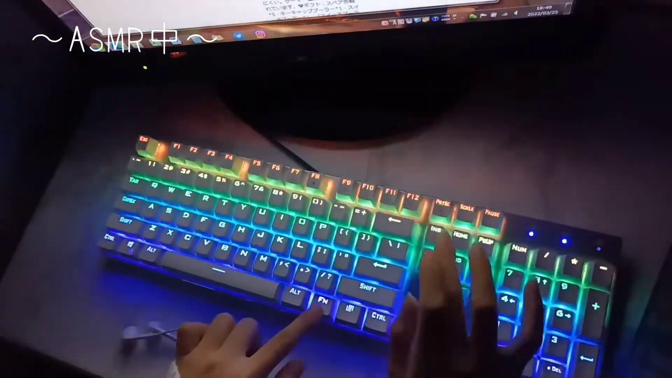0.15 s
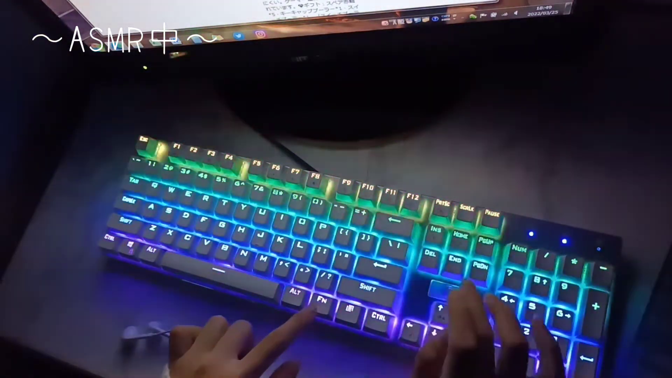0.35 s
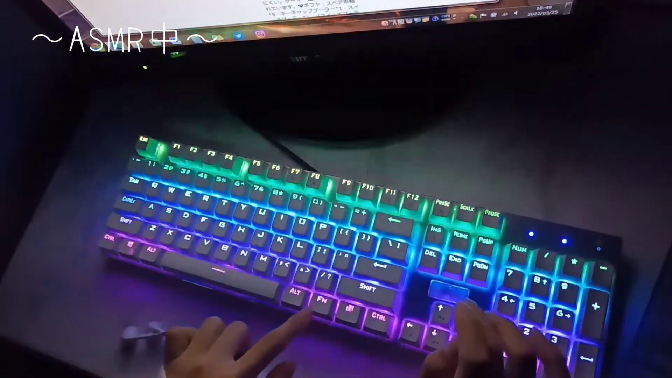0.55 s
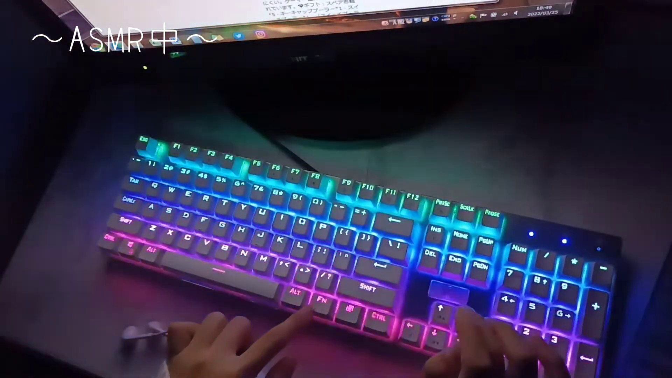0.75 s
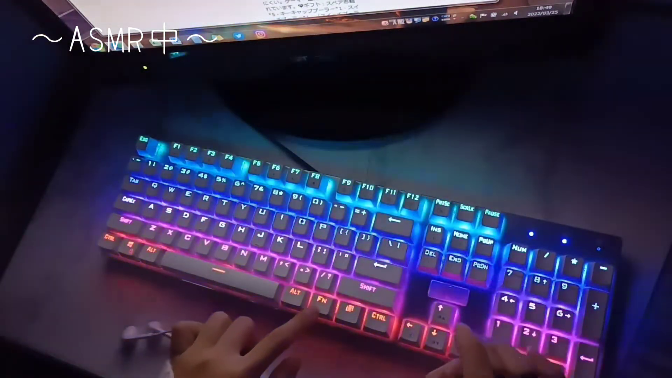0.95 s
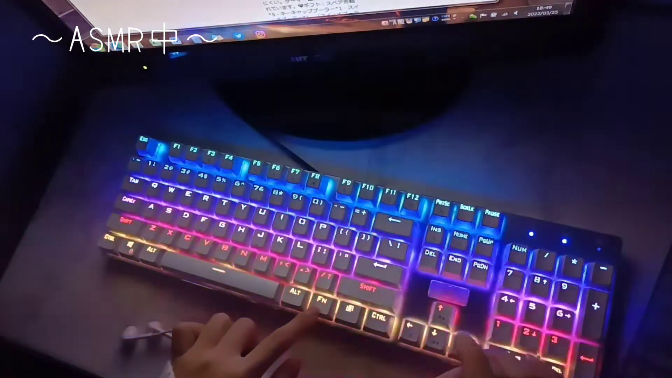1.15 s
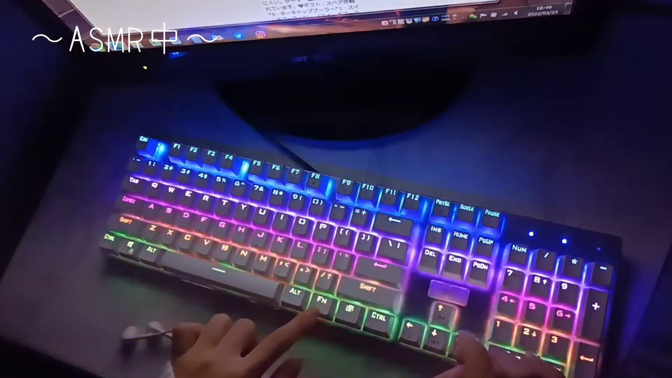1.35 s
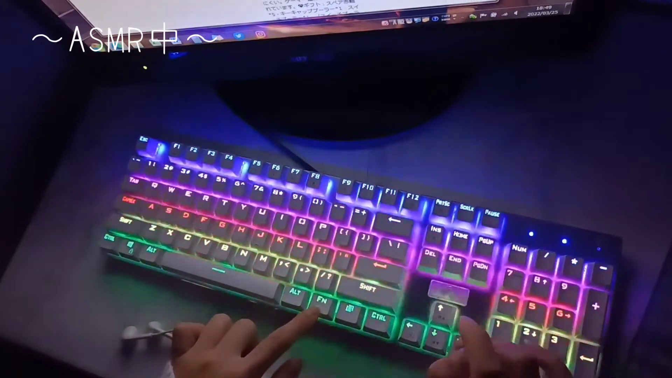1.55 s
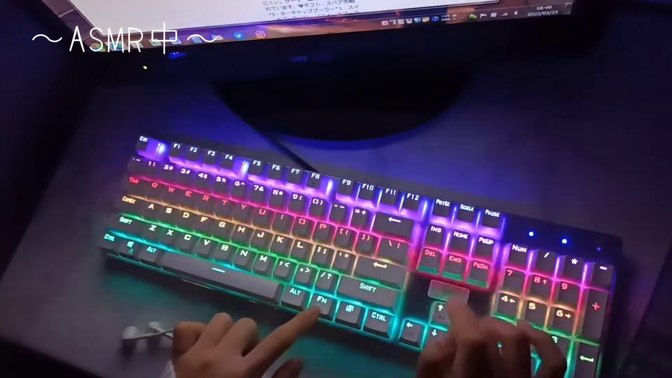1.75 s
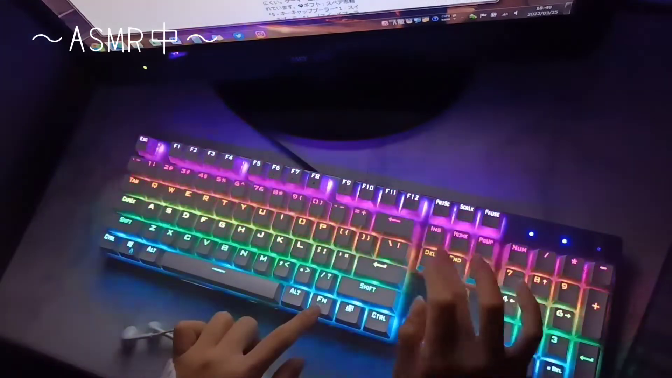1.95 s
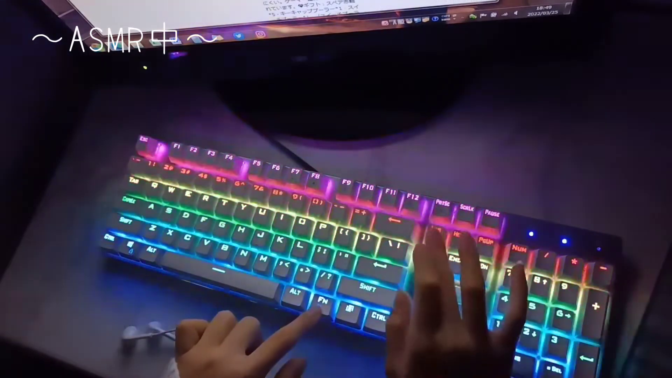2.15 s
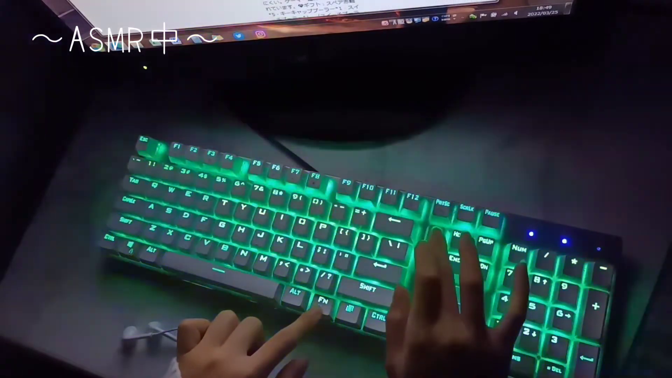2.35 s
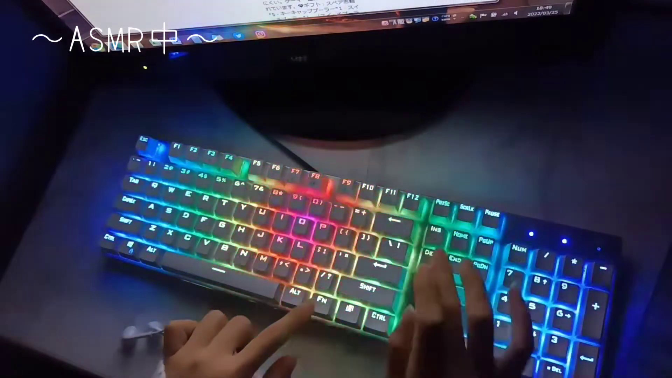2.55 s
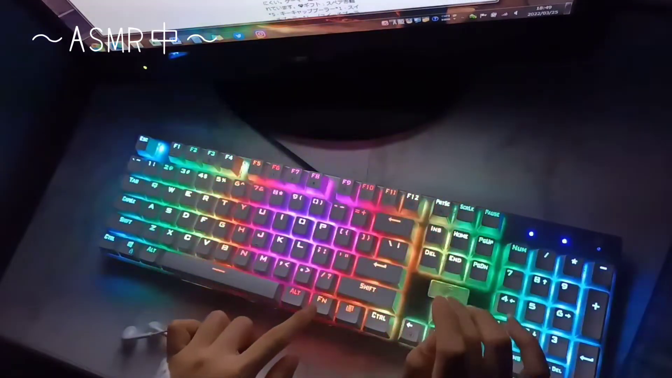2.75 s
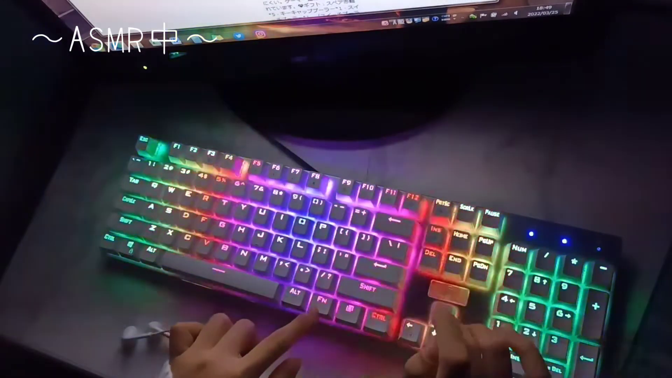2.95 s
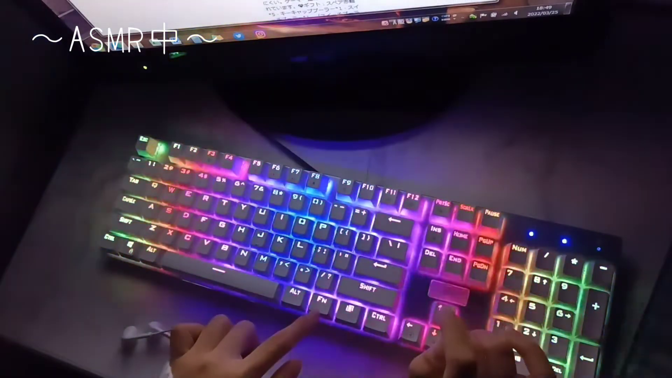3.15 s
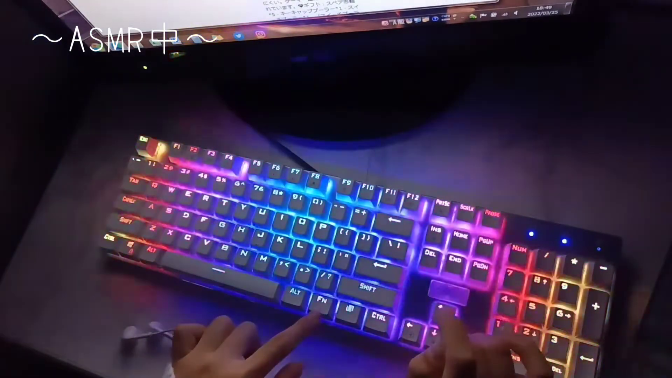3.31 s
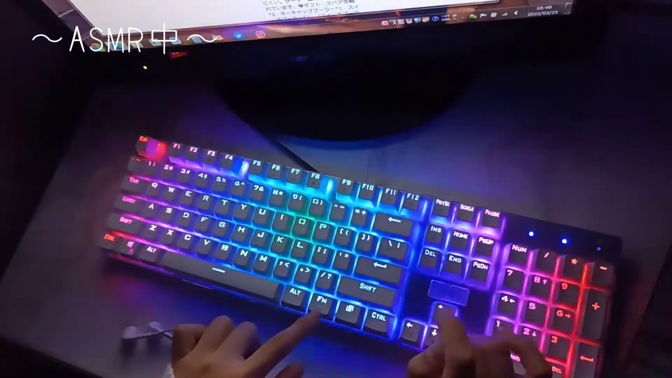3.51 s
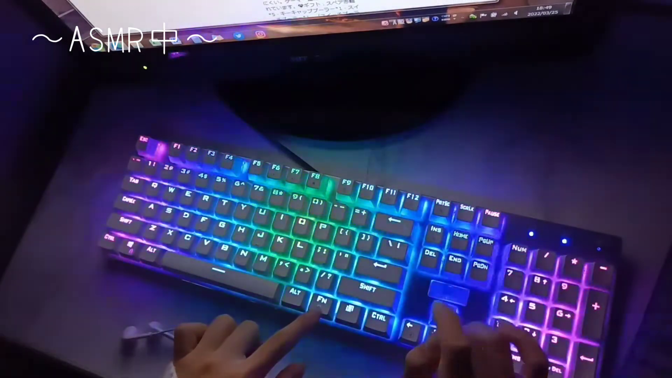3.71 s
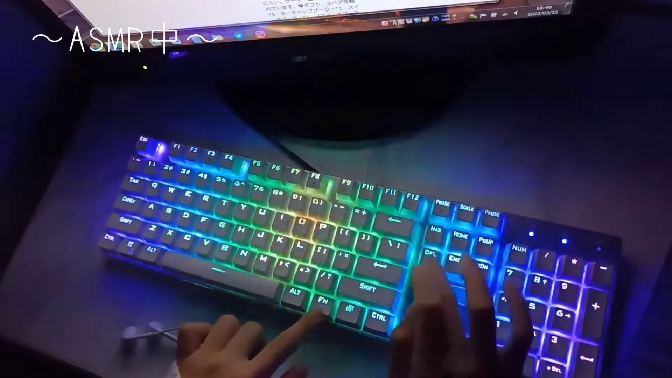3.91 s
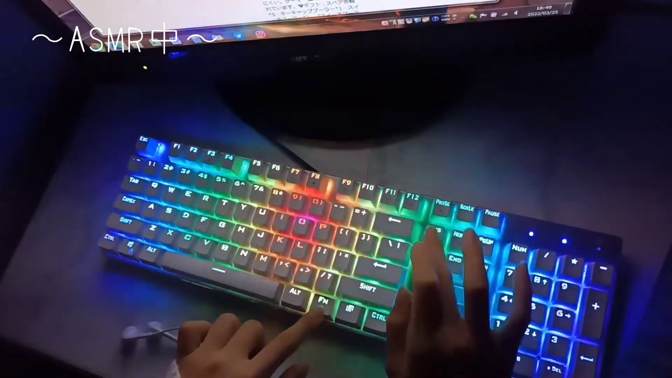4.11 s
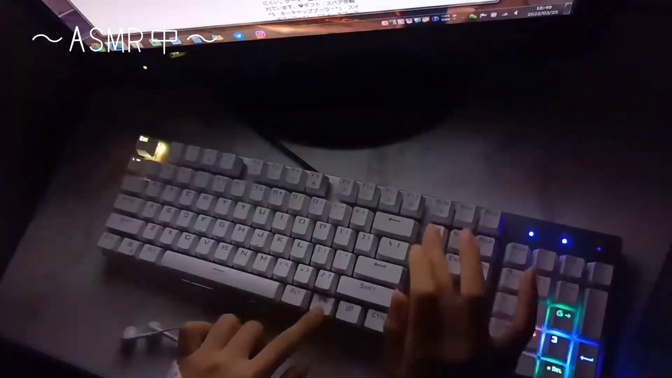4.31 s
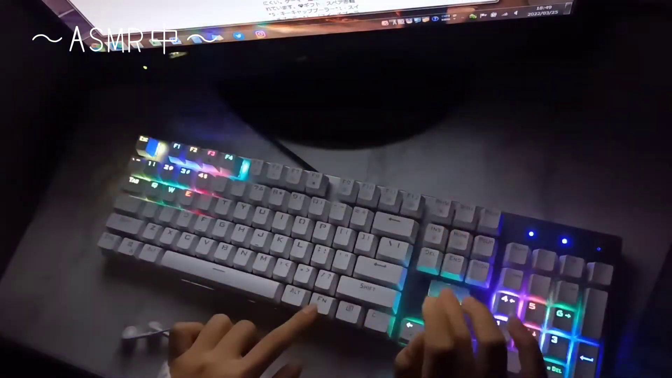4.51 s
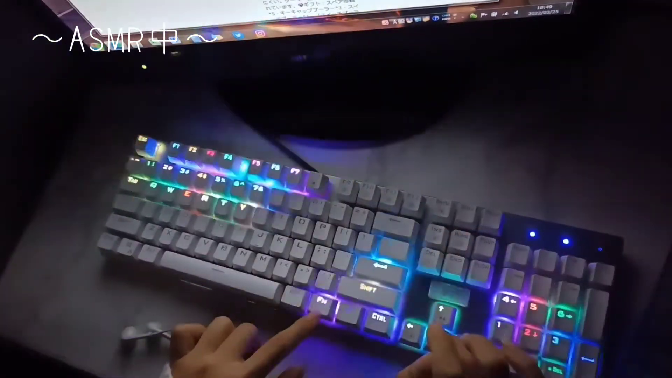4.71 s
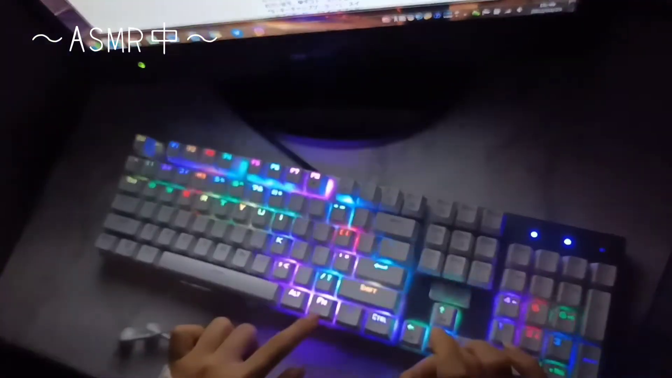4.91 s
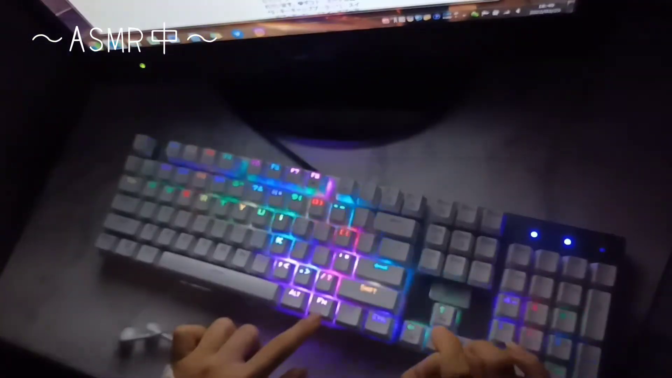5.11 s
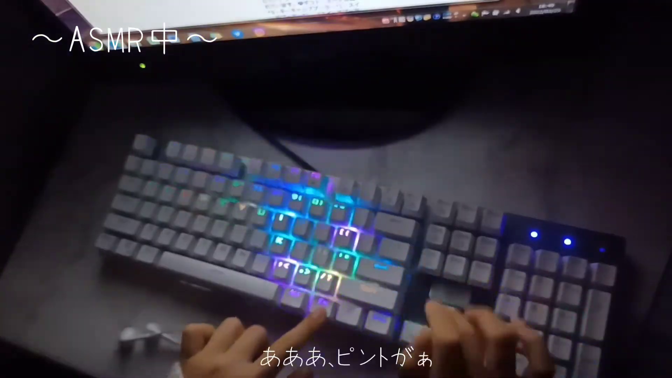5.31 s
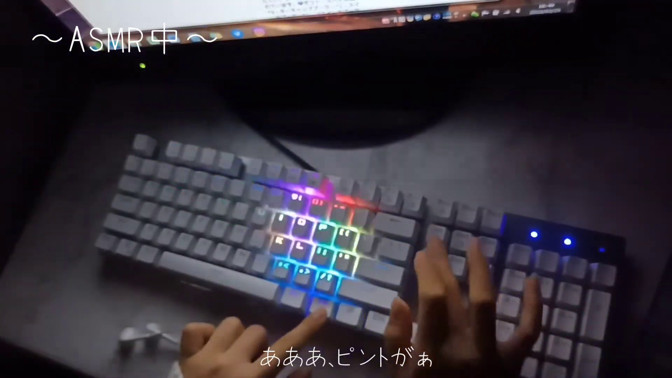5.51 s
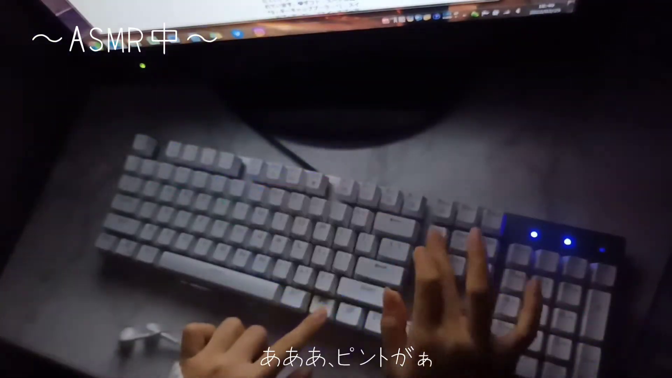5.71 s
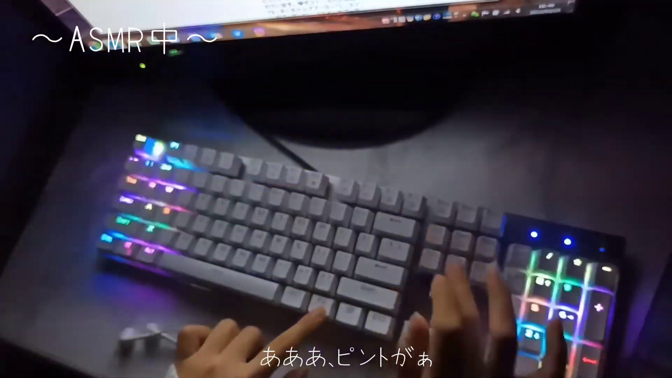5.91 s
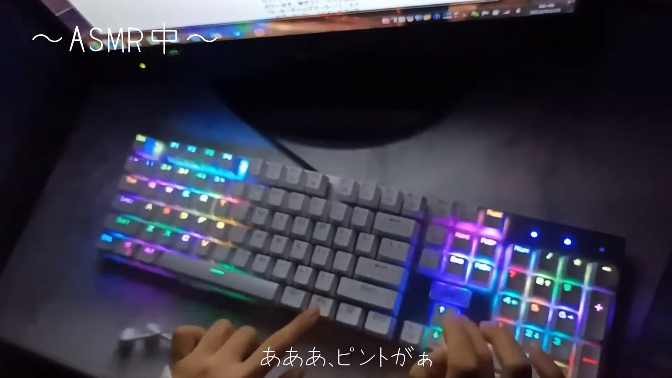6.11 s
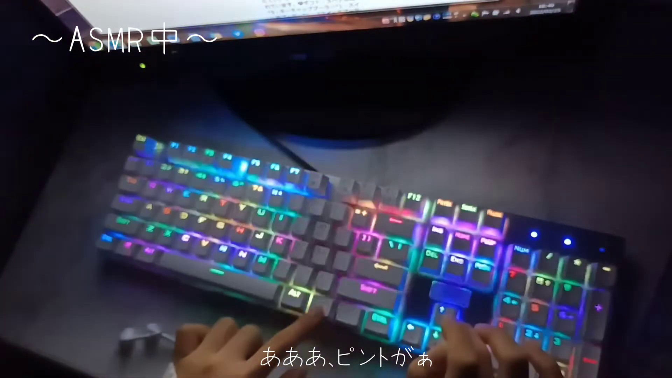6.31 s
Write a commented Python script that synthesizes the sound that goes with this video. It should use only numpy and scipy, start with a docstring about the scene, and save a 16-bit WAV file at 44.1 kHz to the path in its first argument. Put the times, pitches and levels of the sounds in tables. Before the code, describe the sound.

A mechanical keyboard on a desk, heard very close in a small quiet room. A loud key clack opens, springing back with a brighter rattle, then light taps. After nearly two seconds of quiet come a softer keystroke with a doubled rattle and finger fumbling, later two more keystrokes with taps and brief airy swishes of skin over keycaps. Faint hiss lies underneath.

```python
"""A mechanical keyboard on a desk, close to the microphone in a quiet room, one hand on its keys.
Four times a key bottoms out with a clack and springs back with a brighter rattle: plate modes ring
under bursts of plastic chatter. Fingers tap and nudge the caps around it, with the same two layers.
Fingertips swish and scuff over the caps as swelling filtered noise; air and hiss lie under it all."""
import sys
import numpy as np
from scipy import signal
from scipy.fft import rfft, irfft, next_fast_len
from scipy.io import wavfile
from scipy.ndimage import uniform_filter1d

SR = 44100
rng = np.random.default_rng(int(sys.argv[2]) if len(sys.argv) > 2 else 0)


def to_wav(sig):
    """Store sig (one row per channel, or 1-D mono) as 16-bit WAV at the path in sys.argv[1].

    Samples outside -1..1 are clipped; the rate is SR.
    """
    pcm = np.clip(np.atleast_2d(sig), -1, 1) * 32767
    pcm = np.round(pcm).astype(np.int16)
    wavfile.write(sys.argv[1], SR, pcm.T)  # frames by channels


N = 284886  # length in samples
TIME = np.arange(N) / SR  # time in the scene (s)
AGE = np.arange(SR // 2) / SR  # time since a contact (s)


def amp(db):
    """Decibels to gain."""
    return 10 ** (np.asarray(db) / 20)


def unit(x):
    """Scale to rms 1."""
    return x / np.sqrt(np.mean(x ** 2) + 1e-20)


def strike_level(x, count):
    """Scale so that the first count samples have rms 1."""
    return x / np.sqrt(np.mean(x[:count] ** 2) + 1e-20)


def along(points, hz):
    """Read (f/Hz, value) points on a log frequency axis."""
    f, value = np.transpose(points)
    return np.interp(np.log(hz + 1), np.log(f + 1), value)


def noise(spectrum, size):
    """Noise of rms 1 with the given spectrum."""
    m = next_fast_len(size)
    gain = amp(along(spectrum, np.fft.rfftfreq(m, 1 / SR)))
    shaped = irfft(rfft(rng.standard_normal(m)) * gain, m)
    return unit(shaped[:size])


def highpass(x, edge_hz, order):
    """Causal bass cut."""
    sos = signal.butter(order, edge_hz, "highpass", fs=SR, output="sos")
    return signal.sosfilt(sos, x)


def lumps(size, depth_db, count):
    """An uneven gain that wanders over about count samples."""
    wander = uniform_filter1d(rng.standard_normal(size), size=count)
    return amp(depth_db * unit(wander))


def strokes(rows):
    """Gain over time of strokes that swell and fade, from rows of (t/s, level/dB, rise/s, fall/s)."""
    gain = np.zeros(N)
    for s, db, rise, fall in rows:
        half_length = np.where(TIME < s, rise, fall)
        gain += amp(db) * np.exp(-((TIME - s) / half_length) ** 2 / 2)
    return gain


def add(track, s, x):
    """Mix x into the track at time s."""
    part = track[max(round(s * SR), 0):][:len(x)]
    part += x[:len(part)]


# room air and microphone hiss, relative spectrum: f/Hz, level/dB per Hz
AIR_SPECTRUM = [(20, -7), (35, -34), (70, -12.5), (90, -16), (115, 0.5), (205, -1), (232, 4), (260, -1.5),
                (1000, -7), (2400, -12.5), (4500, -14), (5100, -17), (5900, -15), (6600, -19.5),
                (15500, -21.5)]


def background():
    """Steady room air and microphone hiss."""
    return amp(-64.5) * noise(AIR_SPECTRUM, N)


# decay of the small room: f/Hz, t60/s
ROOM_DECAY = [(150, 0.53), (1500, 0.24), (4000, 0.21), (9000, 0.16), (15000, 0.35)]


def in_room(x, wet_db):
    """A contact plus the room's short answer, which builds up as the walls reply."""
    hz, t, z = signal.stft(rng.standard_normal(len(AGE)), SR, nperseg=256)
    decay = amp(-60 * t / along(ROOM_DECAY, hz)[:, None])
    tail = signal.istft(z * decay, SR, nperseg=256)[1][:len(AGE)]
    tail = tail * (1 - np.exp(-(AGE / 0.0028) ** 2))
    reply = signal.fftconvolve(x, tail / np.linalg.norm(tail))[:len(x)]
    return x + amp(wet_db) * reply


DESK_HZ = 750  # modes below this belong to the desk


def ring(modes, hardness_db, lag, swell_cycles, scatter_db, desk_lag=0.0019, desk_swell_cycles=0.77):
    """The plate's modes swell over about a cycle; the blow reaches the desk through the feet (lags in s)."""
    hz, t60, db = np.transpose(modes)[:, :, None]
    hz = hz * (1 + 0.006 * rng.standard_normal(hz.shape))  # the finger loads the plate differently each time
    desk = hz < DESK_HZ
    t = np.maximum(AGE - np.where(desk, desk_lag, lag), 0)
    tilt = hardness_db * np.log2(hz / 1000)  # a harder, shorter contact favours the high modes
    scatter = scatter_db * rng.standard_normal(hz.shape)
    strength = amp(db + tilt + scatter - 60 * t / t60)
    swell = 1 - np.exp(-t * hz / np.where(desk, desk_swell_cycles, swell_cycles))
    tones = strength * swell * np.sin(2 * np.pi * hz * t)
    return strike_level(np.sum(tones, axis=0), count=265)


CAP_HZ = 1700  # a keycap is too small to radiate below this


def chatter(spectrum, t60, rise):
    """Plastic parts chatter unevenly against each other for a few milliseconds."""
    envelope = amp(-60 * AGE / t60) * (1 - np.exp(-AGE / rise))
    uneven = envelope * lumps(len(AGE), depth_db=2.0, count=30)
    burst = highpass(uneven * noise(spectrum, len(AGE)), CAP_HZ, order=3)
    return strike_level(burst, count=176)


# tick of a switch, relative spectrum: f/Hz, level/dB per Hz
TICK_SPECTRUM = [(3000, -51), (6000, -23), (7000, -6.5), (7700, -6), (8500, -8), (9600, -7.5), (10700, -15),
                 (12500, -18.5), (14200, -18.5), (16000, -28)]


def keys(contacts, modes, snap, lag, swell_cycles, rise, rattle, tick_life,
         plate_db, snap_db, tick_db, tick_growth, wet_db):
    """Each contact: the switch ticks, the keycap snaps and the plate rings on; the tick follows the click.

    lag and rise are in s, rattle is the snap's t60 in s, tick_life the tick's share of that t60.
    """
    track = np.zeros(N)
    loudest = max(click for s, knock, click, hardness in contacts)
    for s, knock, click, hardness in contacts:
        body = amp(knock + plate_db) * ring(modes, hardness, lag, swell_cycles, scatter_db=2.0)
        cap = amp(click + snap_db) * chatter(snap, rattle, rise)
        tick_level = loudest + tick_db + tick_growth * (click - loudest)
        tick = amp(tick_level) * chatter(TICK_SPECTRUM, rattle * tick_life, rise)
        add(track, s, in_room(body + cap + tick, wet_db))
    return track


# fingers feel their way over the caps' edges: t/s at the strongest, level/dB before trim, half length/s
FUMBLE_STROKES = [(2.631, -50, 0.0075), (4.406, -51.5, .008), (5.353, -52.5, .014), (5.95, -49.5, 0.01)]


def brushes():
    """Pad strokes on the caps' edges: one ahead of every contact and one through every fumble."""
    kinds = [  # contacts, (lead/s, level/dB over the contact's knock entry, half length/s)
        (KEY_PRESSES, (0.013, -24.5, 0.0087)),
        (KEY_RELEASES, (0.005, -19.5, 0.0076)),
        (CAP_TAPS, (0.019, -26.5, 0.032)),
    ]
    rows = [(s, db, half, half) for s, db, half in FUMBLE_STROKES]
    for contacts, (lead, db, half) in kinds:
        rows += [(s - lead, knock + db, half, half) for s, knock, *_ in contacts]
    return rows


# fingertip slides: t/s at the strongest, level/dB before trim, half length of the swell/s
FINGER_SLIDES = [(.19, -59, .011), (0.39, -59.5, 0.0094), (2.296, -51.5, .015), (2.474, -46, .014),
                 (2.634, -47.5, 0.017), (4.085, -50, .012), (4.209, -57, 0.016), (4.462, -54.5, .019),
                 (5.718, -49.5, 0.022), (5.922, -48.5, .016)]
# skin sliding over a cap, relative spectrum: f/Hz, level/dB per Hz
SKIN_SPECTRUM = [(300, -12), (1100, -5), (3600, -10), (4600, 0), (5400, -5), (6700, -10), (8400, -7.5),
                 (9300, -1), (11200, 0), (13300, -2.5), (15500, -17)]
# finger pad on a cap's edge, relative spectrum: f/Hz, level/dB per Hz
PAD_SPECTRUM = [(200, 1.5), (600, -5), (1100, 8.5), (1700, 4.5), (3000, -3), (4300, 1.5), (5300, -13),
                (7700, -8), (15000, -19)]


def fingertips():
    """Skin sliding over a cap gives a smooth, high swish; at a cap's edge it sticks and slips in small grains."""
    fall_over_rise = 1.13  # a slide fades a little more slowly than it swells
    slides = [(s, db, half, half * fall_over_rise) for s, db, half in FINGER_SLIDES]
    swish = amp(-5.0) * strokes(slides) * noise(SKIN_SPECTRUM, N)
    grains = unit(lumps(N, depth_db=4.5, count=90) * noise(PAD_SPECTRUM, N))
    scuff = amp(-4.5) * strokes(brushes()) * grains
    return swish + scuff


def nudges():
    """In each fumble three loose caps knock lightly, one after another at uneven gaps."""
    knock_db, click_db = -3, -4  # over the fumble's level entry
    hardness_db = -1.5  # dB per octave
    rows = []
    for s, db, half in FUMBLE_STROKES:
        for place in np.linspace(-1, 1, 3):
            moment = s + 0.7 * half * (place + 0.3 * rng.standard_normal())
            rows.append((moment, db + knock_db, db + click_db, hardness_db))
    return rows


# a finger or nail lands on a cap:
# t/s, plate knock level/dB before trim, keycap click level/dB before trim, hardness/dB per octave
CAP_TAPS = [(0.2878, -36.5, -36.5, -2), (0.3125, -44, -44.5, -3.5), (2.2162, -34.5, -40, 1),
            (2.391, -58, -44, 6), (2.681, -56, -60, -6), (3.8785, -54.5, -47, 1), (3.9776, -33.5, -35.5, 1),
            (4.2385, -46, -36, -2.5), (4.4298, -38, -34, -4), (5.3155, -56, -51.5, -7.5),
            (5.4035, -45.5, -59, 1), (5.7368, -45, -32.5, -2), (5.9772, -41, -34, -4.5)]
# plate and desk under the tapped caps, near the plate's end: nominal f/Hz, t60/s, relative level/dB
PLATE_END_MODES = [(169, 0.046, -17), (217, 0.045, -11.5), (275.4, 0.18, -20), (371, 0.09, -19.5),
                   (490, 0.06, -17.5), (610, 0.029, -5), (675, 0.039, -11.5), (790, 0.014, -4.5),
                   (910, 0.06, -22), (1042, 0.045, -3), (1128, 0.032, -1), (1410, 0.087, -9),
                   (1625, 0.043, -2), (1822, 0.023, -9), (1910, 0.016, 1.5), (2234, 0.033, -1.5),
                   (2505, 0.024, 0.5), (2375, 0.0093, -25), (2956, 0.023, -7.5), (3165, 0.034, -10),
                   (4720, 0.019, -64), (7800, 0.0063, -5.5), (13800, .02, -19)]
# keycap under a tap, relative spectrum: f/Hz, level/dB per Hz
TAP_SPECTRUM = [(1200, -4), (2500, -4.5), (3500, -8), (4400, -4.5), (5100, -13), (6000, -5), (7500, -30),
                (12000, -67)]


def taps():
    """A sharp tick, then a light knock from the end of the plate."""
    return keys(CAP_TAPS + nudges(), PLATE_END_MODES, TAP_SPECTRUM,
                lag=0.00018, swell_cycles=0.98, rise=0.0001, rattle=0.027, tick_life=0.67,
                plate_db=-4.0, snap_db=-5, tick_db=-12.0, tick_growth=1.37, wet_db=-13.5)


# the key hits bottom: t/s, plate knock level/dB before trim, keycap click level/dB before trim
KEY_PRESSES = [(0.0242, -21, -20), (2.401, -26, -29.5), (4.2595, -26.5, -30.5), (5.7579, -26, -28)]
# the key springs back and rattles against its stop: t/s, knock level/dB and click level/dB before trim
KEY_RELEASES = [(0.0968, -27, -26), (2.4874, -28.5, -26), (2.4926, -31.5, -27.5), (2.523, -35, -34.5),
                (2.533, -41, -36), (4.3156, -28.5, -25.5), (5.8343, -32, -29)]
# plate and desk under the struck key:
# nominal f/Hz, t60/s with the key free, relative level/dB on a press, relative level/dB on a release
PLATE_MODES = [(158, 0.27, -29, -26), (213.4, 0.17, -26, -16), (286.7, 0.18, -29.5, -18),
               (353, 0.023, -13.5, 2.5), (473, 0.046, -22, -2.5), (560, 0.056, -22, -6.5),
               (704, 0.11, -25, -21), (799, 0.079, -10.5, -5), (949, 0.051, -9.5, -4),
               (1070, 0.045, -58, 0.5), (1132, 0.026, 1.5, 0.5), (1180, 0.033, 4, -0.5),
               (1433, 0.049, 5.5, 0.5), (1473, 0.31, -21.5, -20.5), (1522, 0.13, -10, -10),
               (1624, 0.061, -1, -6), (1879, 0.056, -10.5, -9), (1958, 0.026, 10.5, -5),
               (2280, 0.087, -12, -20), (2245, 0.013, -14, -8), (2420, 0.057, -8, -23),
               (2730, 0.039, -0.5, -16), (2872, 0.051, -4, -35), (3270, 0.012, -8, -15),
               (3580, 0.039, -21, -6.5), (3920, 0.019, -15, -11), (4070, 0.015, -12, 4)]
# keycap hitting bottom, relative spectrum: f/Hz, level/dB per Hz
PRESS_SPECTRUM = [(1200, 6), (2600, 2), (3700, -0.5), (4400, -3.5), (5000, -14), (5900, -4), (7500, -68),
                  (12000, -62)]
# keycap springing back, relative spectrum: f/Hz, level/dB per Hz
RELEASE_SPECTRUM = [(1200, 3.5), (2400, -7.5), (3200, -4), (4100, -3), (4600, -2), (5200, -13.5),
                    (5900, 2.5), (7200, -79), (12000, -58)]


def keystrokes():
    """Going down the key drives the plate hard; coming up it rattles against its stop."""
    press_hardness_db, release_hardness_db = -3, -0.1  # dB per octave
    hz, t60, press_db, release_db = np.transpose(PLATE_MODES)
    held = np.transpose([hz, t60 * 0.73, press_db])  # the finger on the key damps the ring
    free = np.transpose([hz, t60, release_db])
    presses = [(*row, press_hardness_db) for row in KEY_PRESSES]
    releases = [(*row, release_hardness_db) for row in KEY_RELEASES]
    down = keys(presses, held, PRESS_SPECTRUM,
                lag=0.00041, swell_cycles=1.5, rise=0.00068, rattle=0.018, tick_life=0.85,
                plate_db=-4.0, snap_db=-5.5, tick_db=-19, tick_growth=0.47, wet_db=-12.0)
    up = keys(releases, free, RELEASE_SPECTRUM,
              lag=0.001836, swell_cycles=0.9, rise=0.00024, rattle=0.025, tick_life=0.8,
              plate_db=-3.0, snap_db=-4.0, tick_db=-7.0, tick_growth=1.0, wet_db=-13.5)
    return down + up


def scene():
    """Keys, fingers and room at one microphone; the keyboard's sounds carry little deep bass."""
    keyboard = highpass(keystrokes() + taps() + fingertips(), edge_hz=114, order=4)
    return (keyboard + background())[None]


def record(dry):
    """The recorder keeps nothing above its band limit."""
    top_hz = 15750
    m = next_fast_len(N + SR // 2)
    in_band = np.fft.rfftfreq(m, 1 / SR) < top_hz
    return irfft(rfft(dry, m) * in_band, m)[..., :N]


dry = scene()
out = record(dry)
to_wav(out)
```